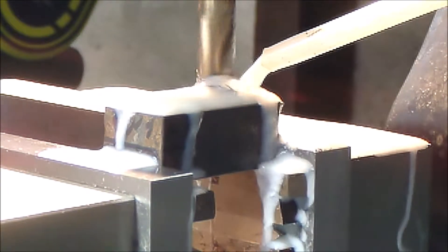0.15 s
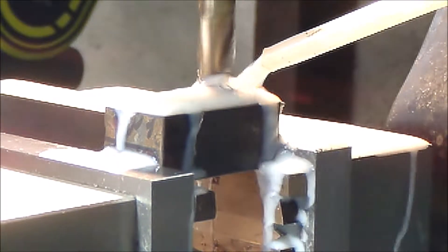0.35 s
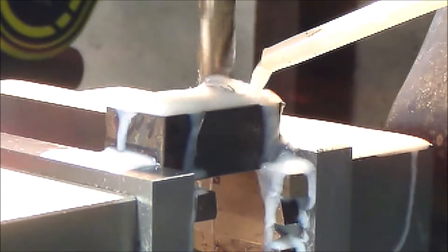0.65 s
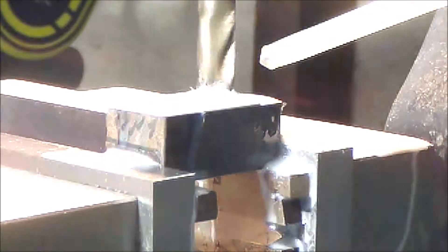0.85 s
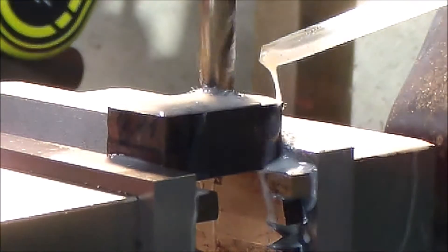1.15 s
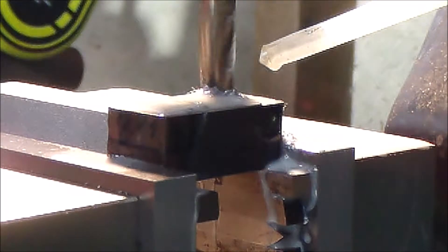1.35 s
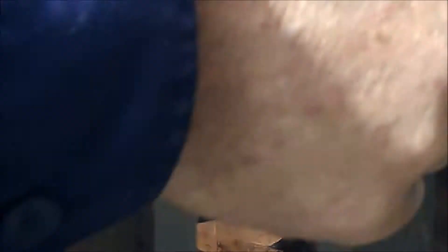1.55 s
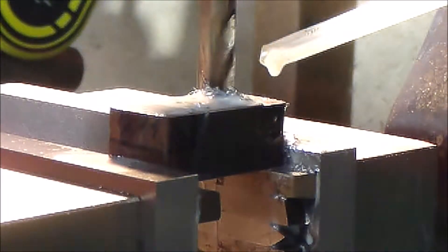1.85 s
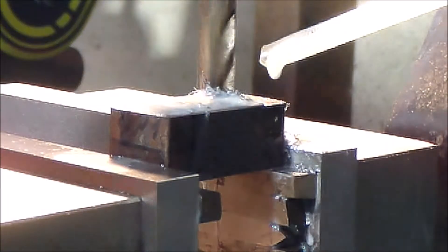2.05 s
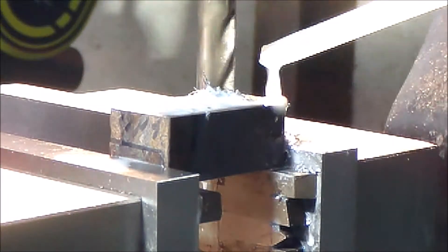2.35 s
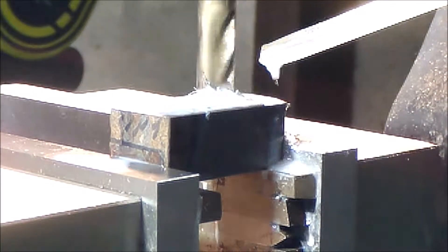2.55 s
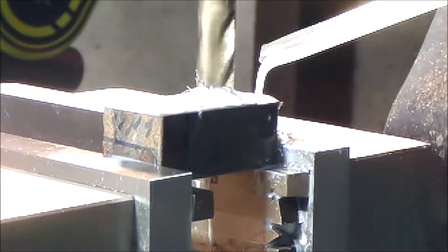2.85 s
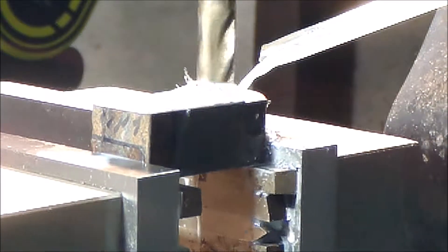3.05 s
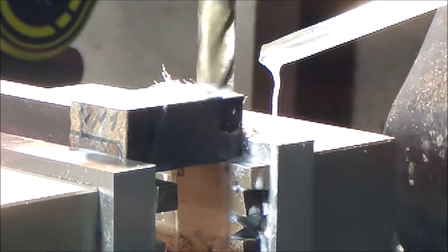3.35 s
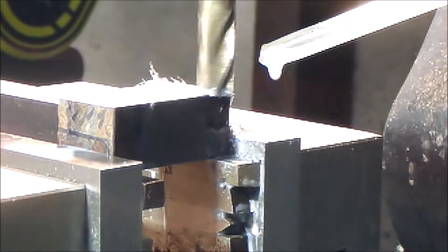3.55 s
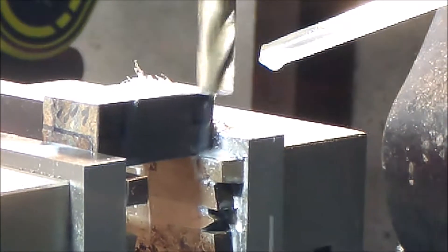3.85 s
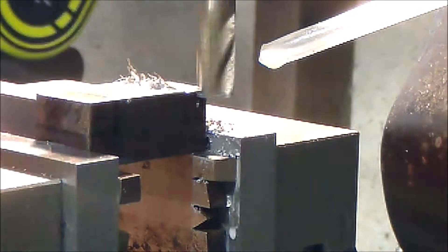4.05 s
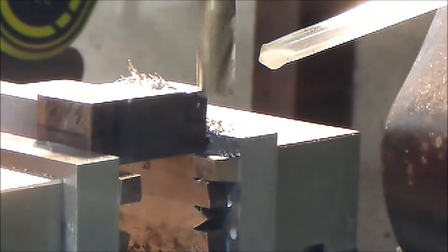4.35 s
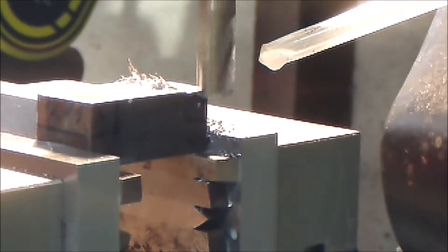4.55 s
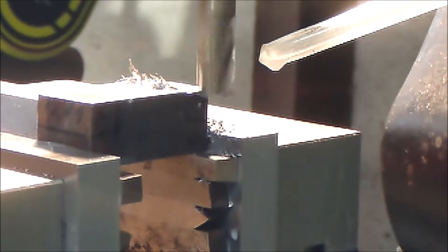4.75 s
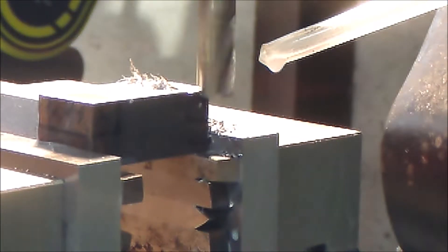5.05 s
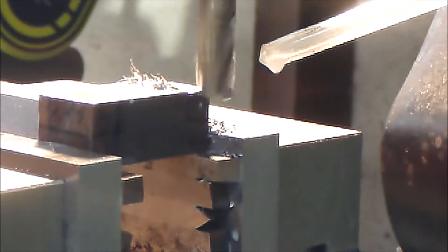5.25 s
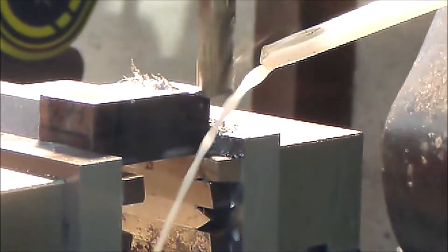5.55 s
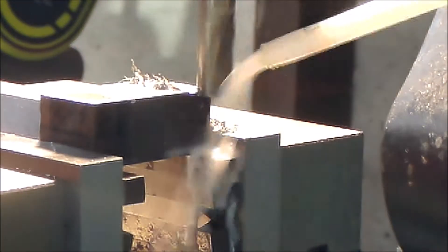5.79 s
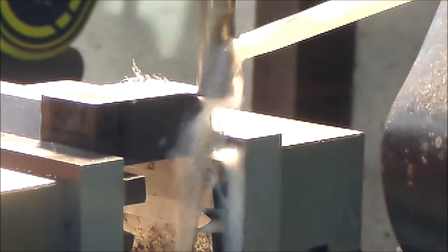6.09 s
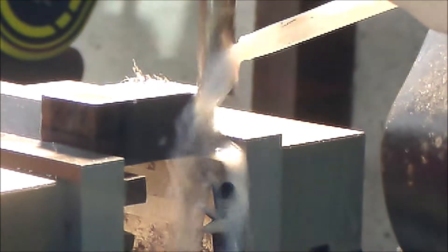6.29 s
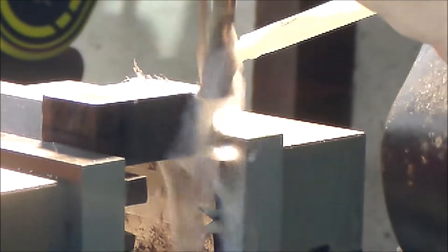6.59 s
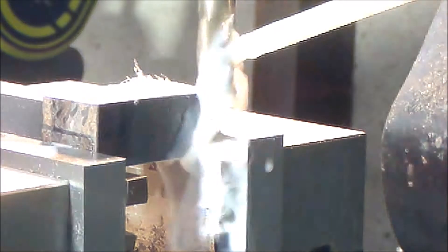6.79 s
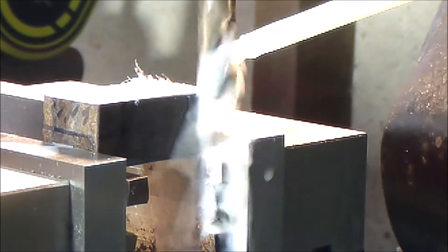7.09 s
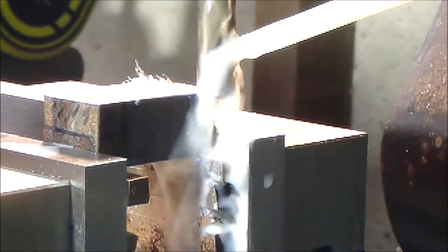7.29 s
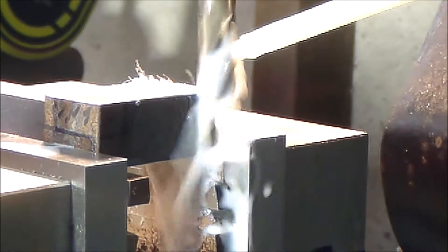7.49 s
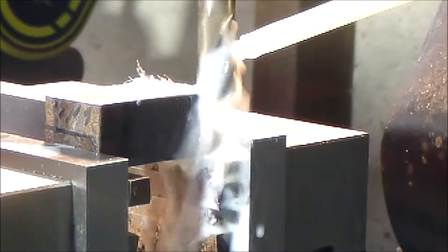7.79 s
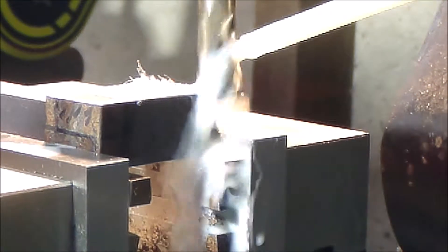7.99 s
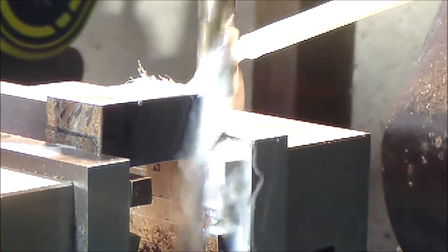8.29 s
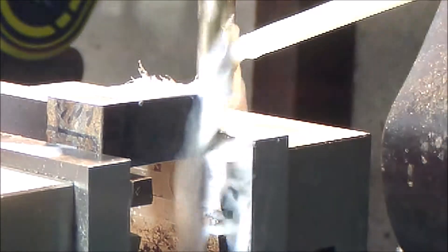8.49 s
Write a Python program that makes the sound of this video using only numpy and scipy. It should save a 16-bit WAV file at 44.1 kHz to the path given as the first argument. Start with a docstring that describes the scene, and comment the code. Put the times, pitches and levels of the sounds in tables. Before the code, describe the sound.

A fast spindle drive whines at fixed high pitches throughout, with ringing metallic hiss around it. The first cut dies away, leaving the idle machine, faint hum and two crisp chip-like ticks. A jolt starts a one-second rising and falling motor whirr. Then the cutter bites again, its rough scrape growing over a throbbing hum. Close, dry, centred pickup in a workshop.

```python
"""A fast shaft's ball bearing whines over the hiss of a ringing head: a milling machine close by in a workshop.
The whine is a sum of steady tones; the hiss is noise ringing through the casting, with a few brief dips.
The cutter's bites are pulsed noise, over hums and whines made of tones. Two sharp ticks, probably flung chips,
stand out. After the first cut the table shifts with a rising and falling whirr, a row of tones that follow
the motor's pitch; then the next cut starts with a pulsing hum."""
import sys
import numpy as np
from scipy import signal
from scipy.fft import rfft, irfft
from scipy.io import wavfile
from scipy.ndimage import uniform_filter1d

SR = 44100
rng = np.random.default_rng(int(sys.argv[2]) if len(sys.argv) > 2 else 0)


def wrap_up_sound(samples):
    """Save the sound to the file named by the first command line argument, as 16-bit audio."""
    columns = np.atleast_2d(samples).T
    # keep every value between -1 and 1, then stretch to whole-number steps
    tamed = np.clip(columns, -1, 1)
    steps = np.round(tamed * 32767).astype(np.int16)
    wavfile.write(sys.argv[1], SR, steps)


N = 380583
TIME = np.arange(N) / SR
HZ = np.fft.rfftfreq(N, 1 / SR)


def amp(db):
    """Turns decibels into gain."""
    return 10 ** (np.asarray(db) / 20)


def unit(x):
    """Scales a signal to an average strength (rms) of 1."""
    return x / np.sqrt(np.mean(abs(x) ** 2) + 1e-20)


def curves(rows):
    """Joins the rows of a time table by straight lines and returns each column at every sample."""
    s, *columns = np.transpose(rows)
    return [np.interp(TIME, s, column) for column in columns]


def read(points, hz):
    """Reads a curve over pitch, joined by straight lines on a log-frequency axis."""
    f, value = np.transpose(points)
    return np.interp(np.log(hz + 1), np.log(f + 1), value)


def drift(rate):
    """Slow random wandering of rms 1, up to about `rate` changes a second."""
    steps = np.arange(0, N / SR + 1, 1 / 1000)
    f = np.fft.rfftfreq(len(steps), steps[1])
    spectrum = rfft(rng.standard_normal(len(steps)))
    slow = irfft(spectrum / np.sqrt(1 + (f / rate) ** 4), len(steps))
    return np.interp(TIME, steps, unit(slow))


def coloured(x, spectrum, resonances=(), ripple_db=0):
    """Passes x through a body: broad colour, main resonances, and a ripple of many small modes."""
    db = read(spectrum, HZ)
    for hz, width, peak in resonances:
        db = db + peak / (1 + (2 * (HZ - hz) / width) ** 2)
    small = uniform_filter1d(rng.standard_normal(len(HZ)), size=170)
    small = uniform_filter1d(small, size=110)
    # the ripple is weaker in the bass
    ripple = ripple_db * unit(small) * HZ / (HZ + 1500)
    return unit(irfft(rfft(x) * amp(db + ripple), N))


def sine(turns):
    """A tone of rms 1 from its count of cycles."""
    return np.sqrt(2) * np.cos((2 * np.pi * (turns % 1)).astype(np.float32))


def tone(turns, db, waver):
    """A machine tone that wavers a little in level and phase."""
    level = amp(db) * (1 + waver * drift(8))
    return level * sine(turns + waver * drift(8) / (2 * np.pi))


def swell(start, length):
    """One smooth rise and fall."""
    return np.sin(np.pi * np.clip((TIME - start) / length, 0, 1))


def gate(start, end, attack, release):
    """Rises in a straight line, holds, and dies away after the end."""
    return np.clip((TIME - start) / attack, 0, 1) * np.exp(-np.maximum(TIME - end, 0) / release)


# speed of the fast shaft, before its tiny random wander: (start_s, turns_per_s)
SHAFT_SPEED = [(0, 99.59), (3.5, 99.5), (4.6, 99.43), (8.63, 99.47)]


def shaft_turns():
    """Counts the turns of the fast shaft, whose speed sags a little as the work goes on."""
    return np.cumsum(curves(SHAFT_SPEED)[0] * (1 + .0003 * drift(6))) / SR


BALLS = 10
OUTER_PASSES = 4.14  # balls passing a point of the outer race per shaft turn
# tones of the inner race, before the overall whine level:
# (multiple_of_ball_passes, sideband_in_shaft_turns, level_db)
INNER_TONES = [(3, 0, -43.4), (3, 1, -43.0), (4, -4, -44.1), (3, 2, -47.4), (4, -1, -33.0), (4, 0, -24.7),
               (4, 1, -39.1), (5, 0, -39.9), (6, -1, -46.9), (6, 0, -40.8), (6, 1, -53.7), (7, -4, -54.9),
               (6, 2, -54.6), (7, -3, -46.6), (6, 4, -56.9), (7, -1, -51.6), (7, 0, -47.4), (7, 1, -55.6),
               (7, 2, -56.0), (8, 0, -53.1), (9, -1, -47.8), (9, 0, -38.2), (9, 1, -45.1), (10, -2, -42.5),
               (9, 4, -41.9), (10, -1, -40.2), (10, 0, -35.1), (10, 1, -50.2), (10, 2, -49.0),
               (10, 3, -44.5), (13, -1, -50.9)]
# tones of the outer race, same columns: (multiple_of_ball_passes, sideband_in_shaft_turns, level_db)
OUTER_TONES = [(2, 0, -52.7), (3, 0, -56.3), (4, 0, -42.1), (5, -2, -44.6), (5, -1, -33.8), (5, 0, -28.3),
               (5, 1, -41.7), (6, -1, -41.4), (6, 0, -41.3), (7, -1, -43.2), (7, 0, -45.0), (7, 1, -42.0),
               (8, 0, -46.0), (9, -1, -56.5), (9, 0, -54.7), (9, 3, -55.6), (11, 0, -55.7), (11, 1, -54.0),
               (12, 0, -46.8)]


def bearing(shaft):
    """Balls pass a flaw on each race; the load swings once a turn, so the sidebands keep step with their tone."""
    out = np.zeros(N)
    # the two flaws meet the load a third of a turn apart
    races = (INNER_TONES, BALLS - OUTER_PASSES, 0), (OUTER_TONES, OUTER_PASSES, 1 / 3)
    for race, passes, lag in races:
        start = rng.random(size=16)
        for multiple, sideband, db in race:
            # dense modes of the casting scramble the phases of the higher tones
            scramble = rng.random() * (multiple * passes > 27)
            carrier = multiple * passes * shaft + start[multiple]
            turns = carrier + sideband * (shaft + lag) + scramble
            out += tone(turns, db, waver=.11)
    return out


# other steady whines of the drive: (average_pitch_hz, level_db)
DRIVE_TONES = [(1393.1, -51), (1583.3, -54.5), (2111.2, -37.5), (2639.8, -38), (3169.8, -40.5),
               (3459.7, -52), (5206.7, -49), (5354.9, -46.5), (5455, -45.5), (5654, -39), (5767.8, -40),
               (6589, -44.5)]


def drive(shaft):
    """Further whines that keep step with the shaft."""
    # a clock that runs fast or slow with the shaft
    shaft_time = shaft / shaft[-1] * TIME[-1]
    return sum(tone(hz * shaft_time, db, waver=.22) for hz, db in DRIVE_TONES)


# the cuts; force and ringing are gains on top of the cutting noise levels, and throb_s is a moment
# (start_s, end_s, force_db, ringing_db, sizzle_level_db, hum_level_db, throb_s)
CUT_LIST = [(-.5, 0.707, -4, -18, -37.5, -55.5, 0.46), (4.702, 9, -0.8, 2.5, -56, -41.5, 5.437)]
# the force builds as the cutter enters, its ringing builds more slowly, and both die away as it leaves
ENTRY_S, RING_BUILD_S, EXIT_S = 0.43, 1.07, 0.36
# force and ringing between cuts, when the flutes only brush the bar
IDLE_FORCE_DB, IDLE_RING_DB = -24, -23


def engaged(levels_db, attack, release):
    """Gain of a sound that comes with the cuts, at its own level in each."""
    return sum(amp(db) * gate(start, end, attack, release)
               for (start, end, *_), db in zip(CUT_LIST, levels_db))


def loads():
    """Gains of the force on the table, of the cutter's ringing and of the sizzle in the cuts."""
    _, _, force_db, ring_db, sizzle_db, _, _ = np.transpose(CUT_LIST)
    force = np.hypot(amp(IDLE_FORCE_DB), engaged(force_db, ENTRY_S, EXIT_S))
    ring = np.hypot(amp(IDLE_RING_DB), engaged(ring_db, RING_BUILD_S, EXIT_S))
    return force, ring, engaged(sizzle_db, ENTRY_S, EXIT_S)


# colour of the head's rolling noise, only its shape counts: (pitch_hz, density_db_per_hz)
HEAD_COLOUR = [(30.0, -102), (120.0, -89), (300.0, -97), (560.0, -89), (750.0, -77.5), (1500.0, -78),
               (2000.0, -60.5), (3000.0, -59), (4400.0, -80.5), (5700.0, -59), (7300.0, -71),
               (10000.0, -87), (13000.0, -79), (15700.0, -85.5)]
# resonances of the casting: (pitch_hz, width_hz, boost_db)
CASTING_MODES = [(221, 99, 7.3), (364, 92, 19), (540, 56, 5.8), (751, 34, 10), (794, 16, 4.3),
                 (1087, 56, 4.4), (1225, 18, 8), (1366, 123, 8.5), (1613, 108, 12.2), (1898, 22, 10),
                 (1907, 13, 3.9), (2227, 56, 8.4), (3965, 85, 10), (4223, 103, 15.7), (4600, 110, 13.7),
                 (4977, 21, 14.7), (5250, 260, 6.8), (5860, 17, 5.7), (8820, 160, 5.9), (9320, 1010, 9.2),
                 (10080, 1240, 10.9), (11950, 660, 7.5)]
# colour of a bright sizzle in the head, only its shape counts: (pitch_hz, density_db_per_hz)
SIZZLE_COLOUR = [(2700, -26.5), (3100, -5), (3350, -5), (3500, 9.5), (3620, -38), (3800, -5), (4200, -55)]


def head(shaft, cut_sizzle, rolling_db=-24.5, sizzle_db=-40.5, fade_db_per_s=1.1):
    """Rolling noise, pulsed by ball passes and shaft turns, rings through the casting; a sizzle slowly fades."""
    ball_pulse = .05 * sine((BALLS - OUTER_PASSES) * shaft)
    turn_pulse = .04 * sine(3 * shaft) + .04 * sine(4 * shaft)
    pulsing = 1 + ball_pulse + turn_pulse
    rolling = rng.standard_normal(N) * pulsing * amp(.5 * drift(19))
    ringing = coloured(rolling, HEAD_COLOUR, CASTING_MODES, ripple_db=1.8)
    sizzle = coloured(rng.standard_normal(N) * pulsing, SIZZLE_COLOUR)
    # the cuts add their own sizzle to the fading one
    sizzle_gain = np.hypot(amp(sizzle_db - fade_db_per_s * TIME), cut_sizzle)
    return amp(rolling_db) * ringing + sizzle_gain * sizzle


REDUCTION, FLUTES = 5, 4  # shaft turns per spindle turn, cutting edges
# colour of the rumble of table and vice, only its shape counts: (pitch_hz, density_db_per_hz)
RUMBLE_COLOUR = [(100, -32), (165, -25), (275, -22), (335, -2), (400, 1), (465, 0.5), (540, -13.5),
                 (800, -5), (930, -10.5), (1130, -3), (1500, -27), (2000, -24)]
# colour of the scraping flutes, only its shape counts: (pitch_hz, density_db_per_hz)
SCRAPE_COLOUR = [(800, -30), (1500, -13.5), (2000, 7.5), (3100, 3.5), (3700, -11), (4700, -13), (5700, -8),
                 (7000, -29), (15000, -38)]
# resonances of the cutter: (pitch_hz, width_hz, boost_db)
CUTTER_MODES = [(2533, 71, 16.6), (2980, 84, 6.3), (5770, 110, 9.8)]


def cutting(spindle, force, ring, rumble_db=-42., scrape_db=-27.0, uneven_db=1.4):
    """Each flute takes a bite: the table rumbles, the cutter scrapes and rings."""
    bite = 1 + np.exp(-(FLUTES * spindle % 1) / 0.47)
    # the cutter runs slightly off centre, so one side bites deeper
    bite = bite * (1 + .2 * sine(spindle))
    bite = bite * amp(1.0 * drift(30) + uneven_db * drift(3.2))
    rumble = coloured(bite * rng.standard_normal(N), RUMBLE_COLOUR)
    scrape = coloured(bite * rng.standard_normal(N), SCRAPE_COLOUR, CUTTER_MODES, ripple_db=2.5)
    return force * amp(rumble_db) * rumble + ring * amp(scrape_db) * scrape


# tones of the flutes striking, before the force gain: (multiple_of_flute_rate, level_db)
STRIKE_TONES = [(2, -64), (3, -60), (4, -57.5), (4.25, -57.5), (6, -52), (7, -61), (8, -59)]
# now and then the hum swells, on top of the steady hum: (start_s, end_s, level_db)
HUM_SWELLS = [(2.24, 2.62, -41.5), (2.847, 3.104, -42.5), (4.918, 5.096, -38)]
SWELL_RISE_S, SWELL_FALL_S = 0.052, 0.028
# the table motor hums at slow feed; in a cut a tone just below it beats against it
HUM_HZ, BEAT_HZ = 399.5, 1.064


def hum(spindle, force, motor_db=-48.5, throb=0.077, unsteady_db=3.0):
    """Flute strikes make a row of low tones; a cutting tone beats with the motor hum about once a second."""
    strikes = force * sum(tone(k * FLUTES * spindle, db, waver=.2) for k, db in STRIKE_TONES)
    swells = sum(amp(db) * gate(start, end, SWELL_RISE_S, SWELL_FALL_S)
                 for start, end, db in HUM_SWELLS)
    # the steady hum stops during the fast shift
    motor = (amp(motor_db) * (1 - shifting()) + swells) * sine(HUM_HZ * TIME)
    beating = np.zeros(N)
    for start, end, *_, db, throb_s in CUT_LIST:
        lower_tone = sine(HUM_HZ * TIME - BEAT_HZ * (TIME - throb_s))
        beating += amp(db) * gate(start, end, ENTRY_S, EXIT_S) * lower_tone
    humming = motor + beating * amp(unsteady_db * drift(4.5))
    return strikes + humming * (1 + throb * sine(spindle))


# whine of the slow feed: (pitch_hz, level_db)
FEED_TONES = [(188.4, -61), (640.6, -58.5), (753.7, -56), (823.6, -57), (1130, -48)]
FEED_START_S, FEED_STOP_S = 0.24, .025  # rise and fade of the whine with each cut


def feed():
    """The slow feed whines at steady pitches while a cut goes on."""
    feeding = engaged([0] * len(CUT_LIST), FEED_START_S, FEED_STOP_S)
    return feeding * sum(tone(hz * TIME, db, waver=.2) for hz, db in FEED_TONES)


# the ticks: (start_s, level_db, decay_s)
TICK_LIST = [(.6774, -14, .003), (2.4463, -11.5, .008)]
# colour of a tick's crack, only its shape counts: (pitch_hz, density_db_per_hz)
TICK_COLOUR = [(100, -42), (400, -9), (1300, -13), (2100, 4), (3200, -14), (5300, -14), (6500, 5.5),
               (8500, -5.5), (12500, -3.5), (15500, -21)]
# what a tick rings with, relative to the tick's level: (pitch_hz, level_db)
TICK_RING = [(2150, -2), (6500, -7)]


def ticks():
    """Each tick is a crack of noise with a faint tail, plus two tones that ring for milliseconds."""
    out = np.zeros(N)
    crack = coloured(rng.standard_normal(N), TICK_COLOUR)
    for s, db, decay in TICK_LIST:
        age = np.maximum(TIME - s, 0)
        modes = sum(amp(mode_db) * sine(hz * age) for hz, mode_db in TICK_RING)
        modes = modes * np.exp(-age / .003)
        burst = crack * (np.exp(-age / decay) + .12 * np.exp(-age / .016))
        attack = 1 - np.exp(-age / .0003)
        out += amp(db) * attack * (burst + modes)
    # so small a blow radiates no bass
    return signal.sosfilt(signal.butter(4, 900, "highpass", fs=SR, output="sos"), out)


# the fast shift of the table, before a small random wobble: (time_s, motor_pitch_hz)
SHIFT_PITCH = [(2.8, 396.7), (3.018, 545.9), (3.07, 641.9), (3.2, 758.7), (3.356, 823.4), (3.474, 633.6),
               (3.548, 694.8), (3.62, 595.5), (3.718, 676.5), (3.97, 364.1)]
SHIFT_FADE_S = 0.021


def shifting():
    """1 while the table shifts fast, else 0, with a short fade at both ends."""
    return gate(SHIFT_PITCH[0][0], SHIFT_PITCH[-1][0], SHIFT_FADE_S, SHIFT_FADE_S)


# tones of the table motor, before the body and speed gains: (multiple_of_motor_pitch, level_db)
MOTOR_TONES = [(1, -38), (1.27, -44), (2, -37), (5, -41.5), (6.1, -33), (8, -42), (12, -43), (15, -45),
               (19, -41)]
# how well the table radiates the motor's tones: (pitch_hz, gain_db)
TABLE_GAIN = [(300, 9), (480, -12), (660, -9.5), (850, -7.5), (1000, -9), (1300, -4.5), (1600, -6),
              (2500, 10), (3400, 3.5), (3900, -5), (4200, -25), (5000, -12), (6200, -1), (10000, -12)]
# colour of the grinding lead screw, only its shape counts: (pitch_hz, density_db_per_hz)
SCREW_COLOUR = [(1500, -36), (2600, 5), (3400, 1), (4400, -19), (5500, 2), (6300, 9), (7500, -14),
                (12000, -31)]
# the motor gets louder with speed: gain at top speed, and slope below it
TOP_SPEED_DB, DB_PER_OCTAVE = 4.5, 12.5


def table_shift(screw_db=-33.5, flutter_db=2.):
    """The motor sweeps its tones through the table's resonances while the lead screw grinds."""
    hz = curves(SHIFT_PITCH)[0]
    level_db = TOP_SPEED_DB + DB_PER_OCTAVE * np.log2(hz / hz.max()) + flutter_db * drift(24)
    turns = np.cumsum(hz * (1 + .012 * drift(90))) / SR
    whirr = np.zeros(N)
    for k, db in MOTOR_TONES:
        whirr += tone(k * turns, db + read(TABLE_GAIN, k * hz), waver=.3) * (1 + .45 * drift(35))
    grinding = amp(screw_db + 2 * drift(37)) * coloured(rng.standard_normal(N), SCREW_COLOUR)
    return shifting() * amp(level_db) * (whirr + grinding)


# jolts of the table: (start_s, pitch_hz, width_hz, level_db, length_s)
JOLT_LIST = [(2.833, 2270, 300, -22.5, 0.048), (2.846, 392, 119, -43, 0.24), (3.903, 2370, 350, -23, 0.085),
             (5.912, 392, 130, -29, 0.038)]


def jolts():
    """Each jolt briefly shakes one resonance of the machine: a narrow band of noise swells and fades."""
    out = np.zeros(N)
    for s, hz, width, db, length in JOLT_LIST:
        ring = irfft(rfft(rng.standard_normal(N)) / (1 + (2 * (HZ - hz) / width) ** 4), N)
        out += amp(db) * unit(ring) * swell(s, length)
    return out


# brief dips of the hiss: (middle_s, length_s, depth_db)
DIP_LIST = [(3.084, .04, 18), (3.643, 0.034, 30), (5.948, 0.04, 14), (6.602, 0.04, 12), (8.232, .036, 14)]
# how much of that depth each pitch gets: (pitch_hz, share_0_to_1)
SHARE_BY_PITCH = [(100, 0.99), (1400, 1), (1800, 0), (3400, 0), (4500, 0.95), (5300, 0), (6500, 0),
                  (7500, 1)]


def dipped(x):
    """Turns some pitches of the noise down for a moment, while the whine carries on."""
    depth_db = sum(db * swell(s - length / 2, length) for s, length, db in DIP_LIST)
    hz, t, z = signal.stft(x, SR, nperseg=256)
    share = np.clip(read(SHARE_BY_PITCH, hz), 0, 1)[:, None]
    z = z * amp(-share * np.interp(t, TIME, depth_db))
    return signal.istft(z, SR)[1][:N]


def scene(whine_db=-0.77, whine_rise_db_per_s=.14):
    """One shaft times bearing, drive and cutter; both channels are alike."""
    shaft = shaft_turns()
    spindle = shaft / REDUCTION
    force, ring, cut_sizzle = loads()
    whine = amp(whine_db + whine_rise_db_per_s * TIME) * bearing(shaft) + drive(shaft)
    noise = dipped(head(shaft, cut_sizzle) + cutting(spindle, force, ring))
    machine = whine + noise + hum(spindle, force) + feed() + ticks() + table_shift() + jolts()
    return np.array([machine, machine])


def record(dry):
    """Cuts the treble off steeply above 15.8 kHz."""
    lowpass = signal.firwin(1023, 15800, window=("kaiser", 9), fs=SR)
    return signal.oaconvolve(dry, lowpass[None], "same", axes=1)


dry = scene()
out = record(dry)
wrap_up_sound(out)
```